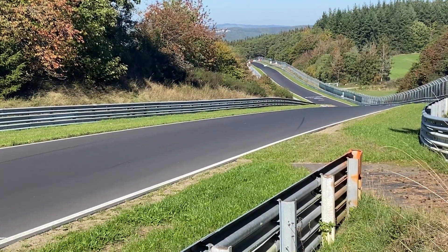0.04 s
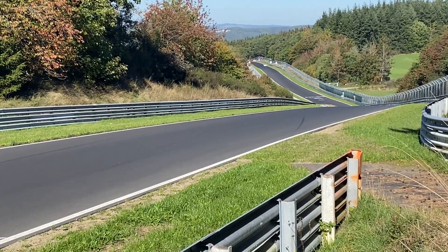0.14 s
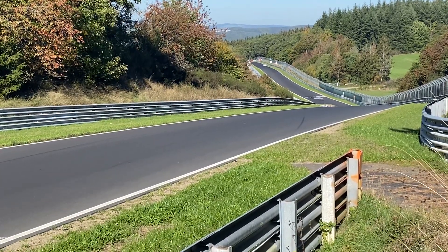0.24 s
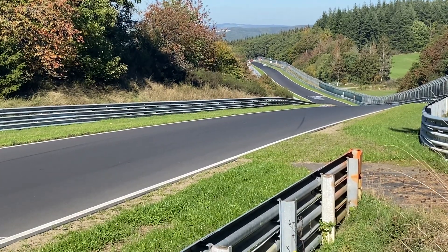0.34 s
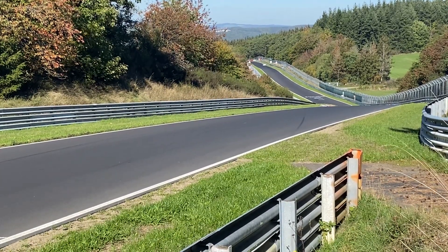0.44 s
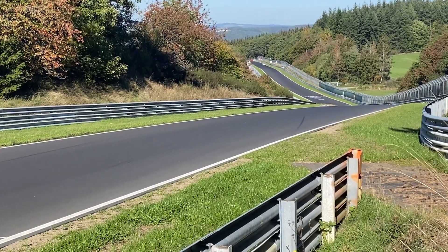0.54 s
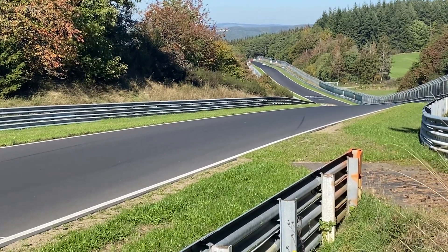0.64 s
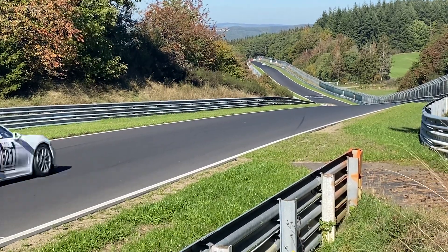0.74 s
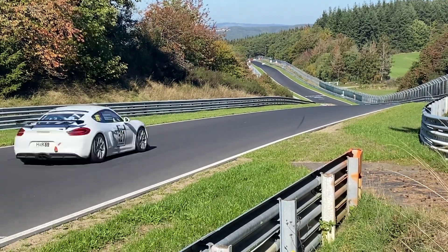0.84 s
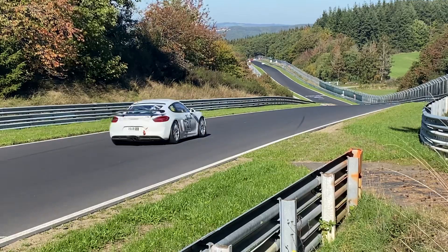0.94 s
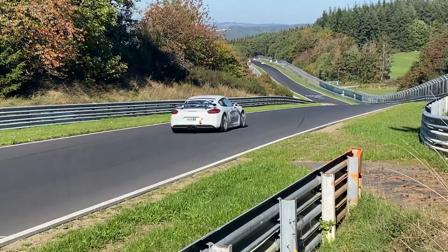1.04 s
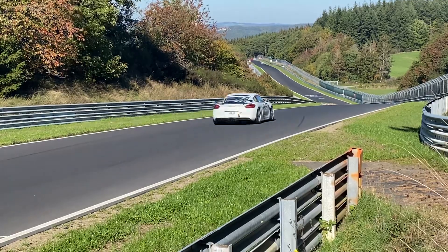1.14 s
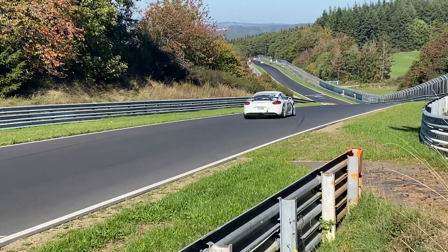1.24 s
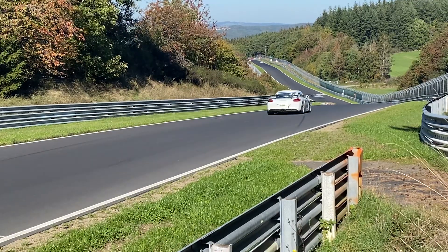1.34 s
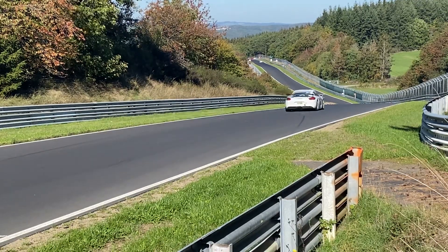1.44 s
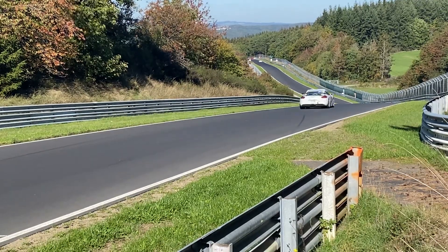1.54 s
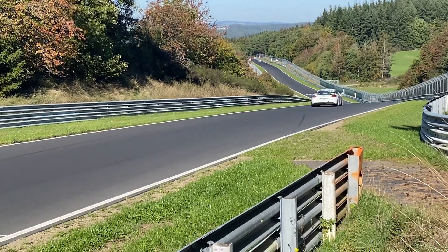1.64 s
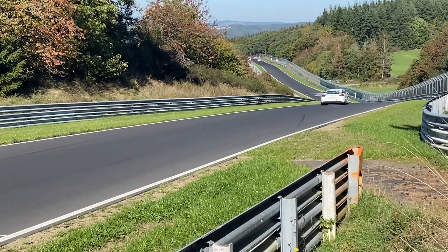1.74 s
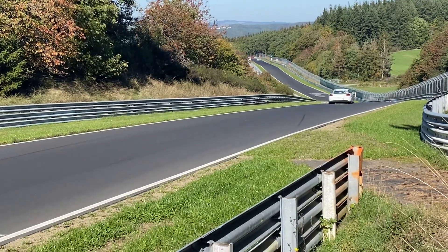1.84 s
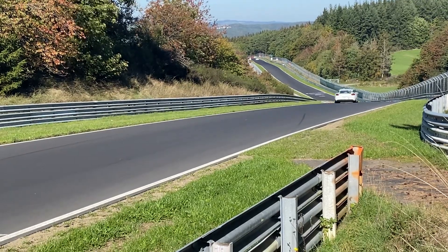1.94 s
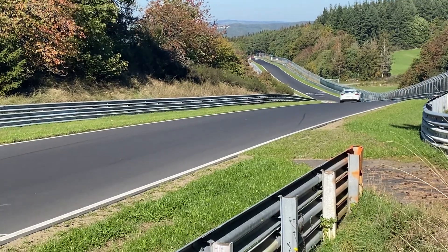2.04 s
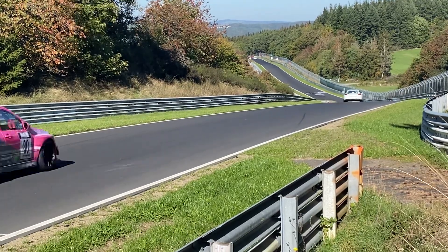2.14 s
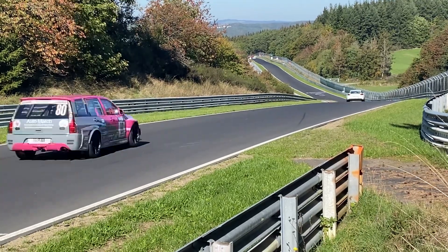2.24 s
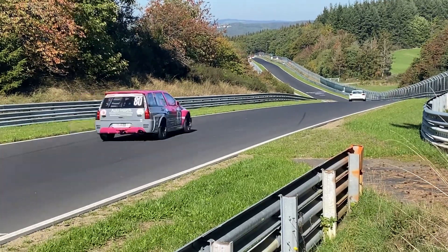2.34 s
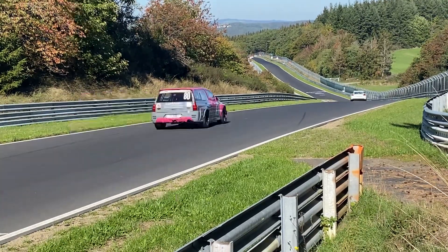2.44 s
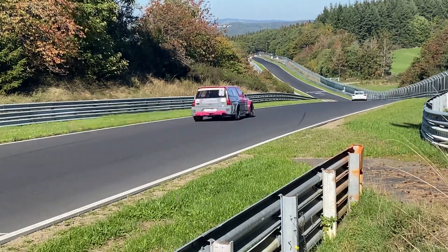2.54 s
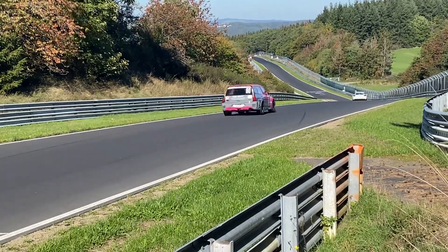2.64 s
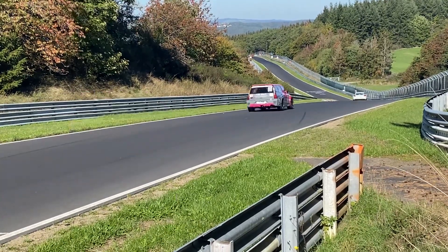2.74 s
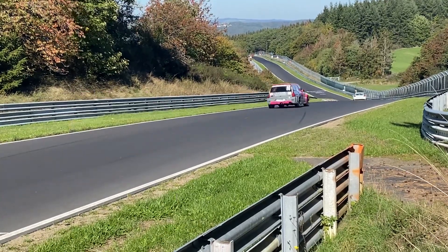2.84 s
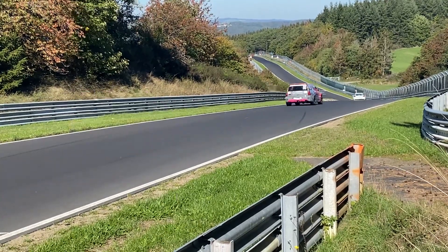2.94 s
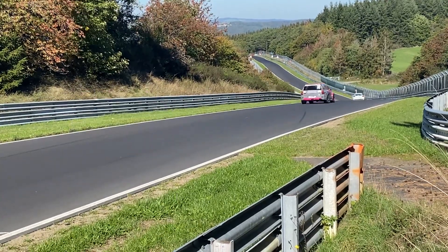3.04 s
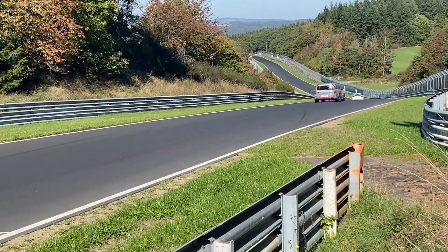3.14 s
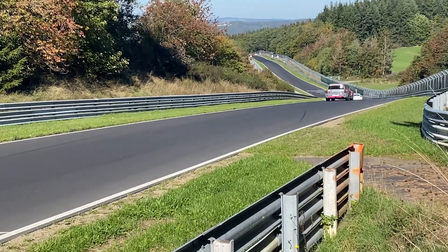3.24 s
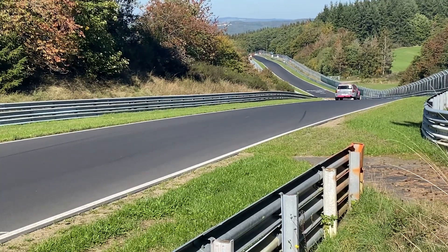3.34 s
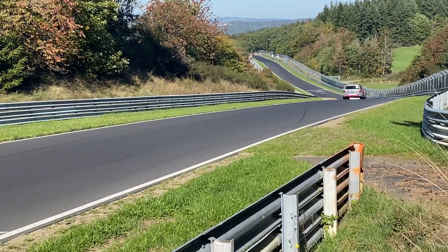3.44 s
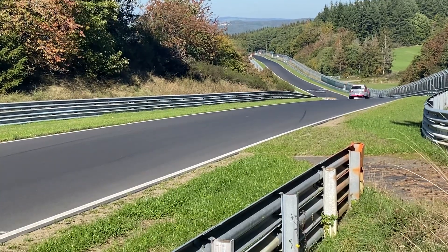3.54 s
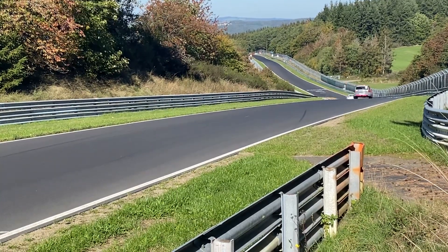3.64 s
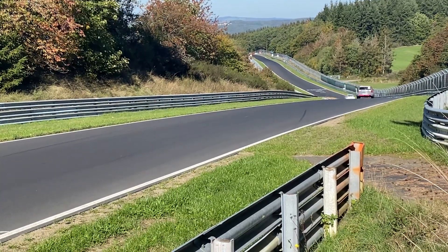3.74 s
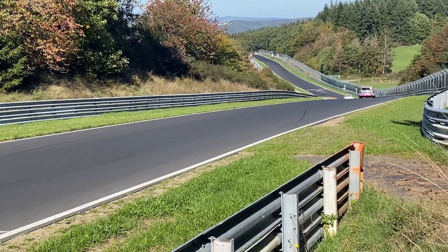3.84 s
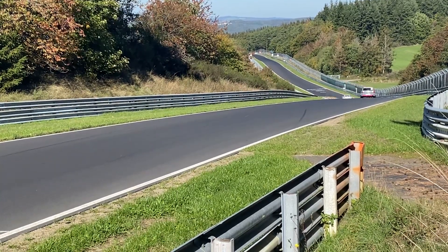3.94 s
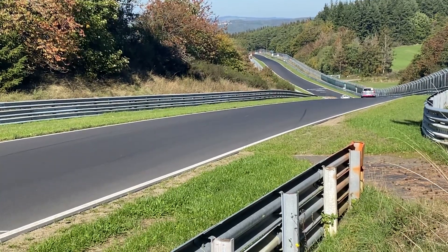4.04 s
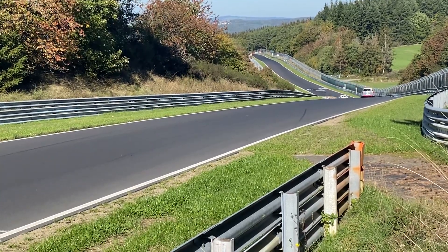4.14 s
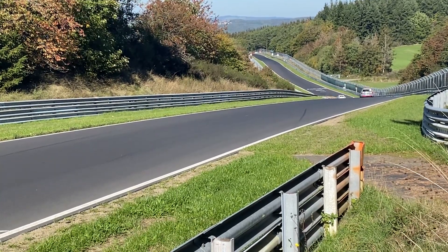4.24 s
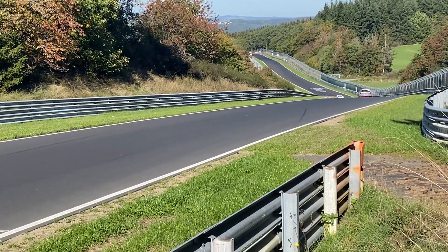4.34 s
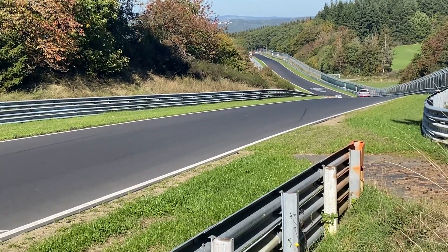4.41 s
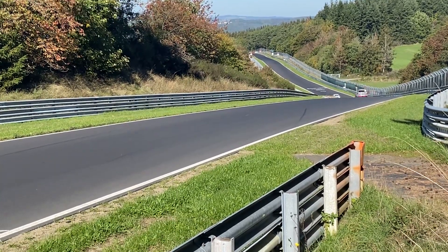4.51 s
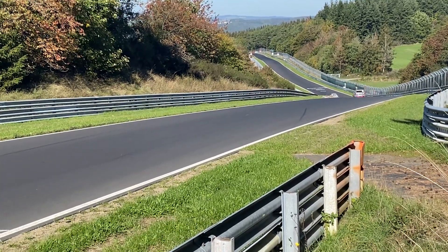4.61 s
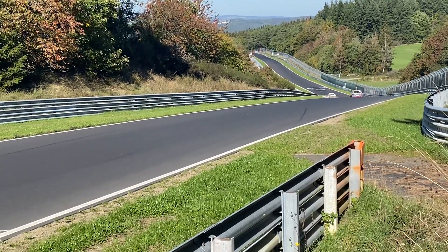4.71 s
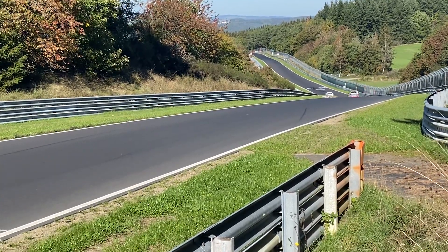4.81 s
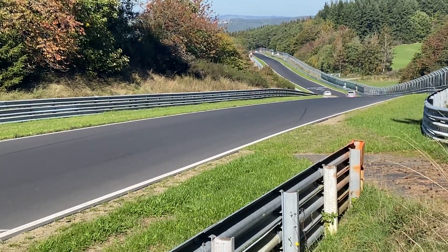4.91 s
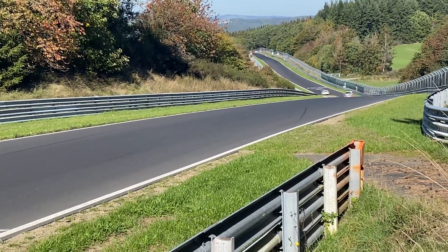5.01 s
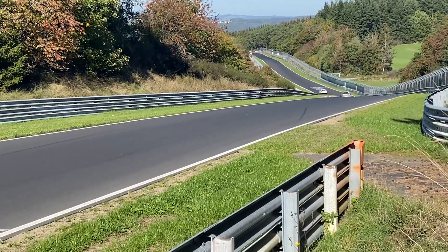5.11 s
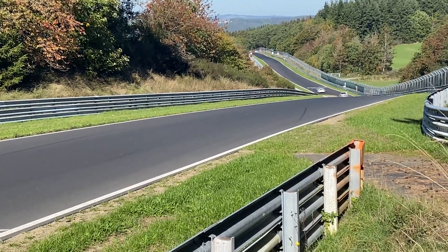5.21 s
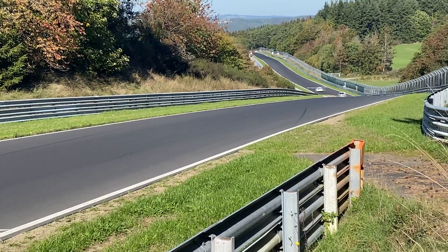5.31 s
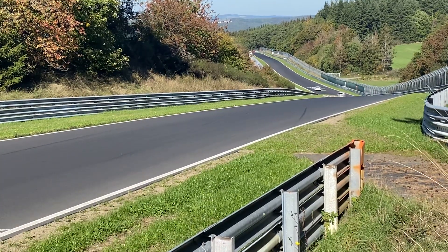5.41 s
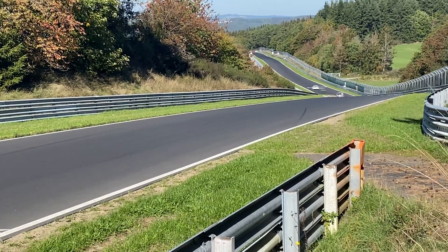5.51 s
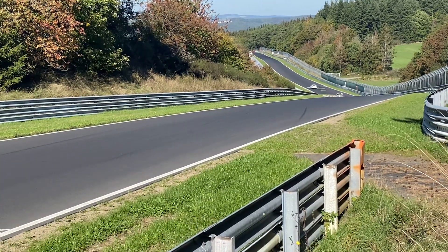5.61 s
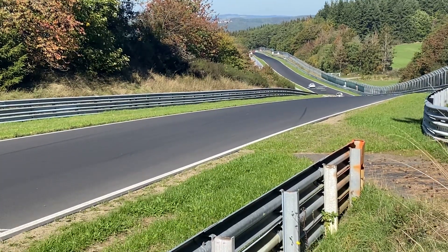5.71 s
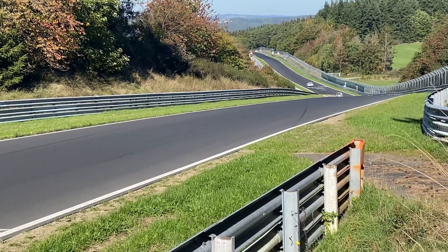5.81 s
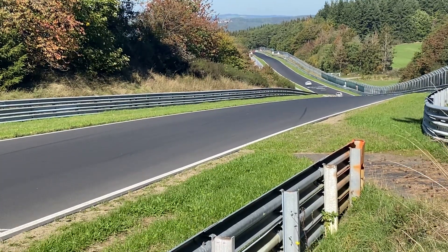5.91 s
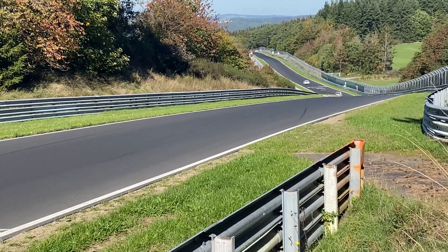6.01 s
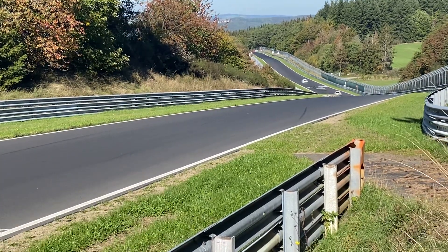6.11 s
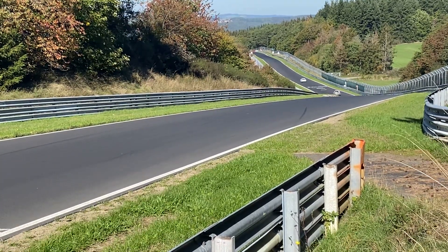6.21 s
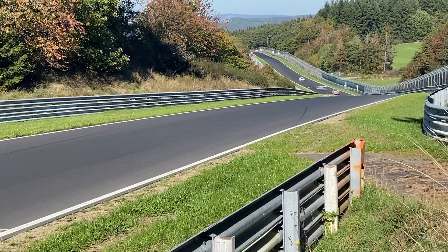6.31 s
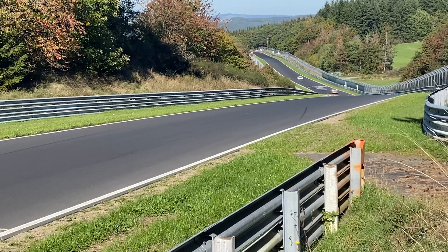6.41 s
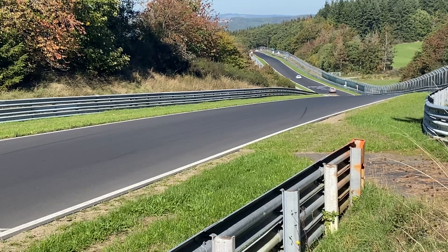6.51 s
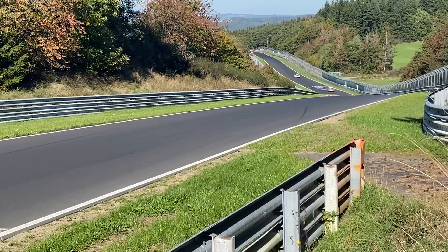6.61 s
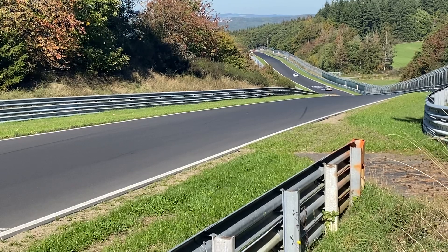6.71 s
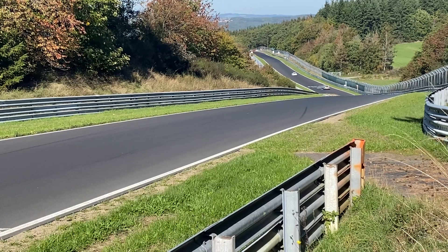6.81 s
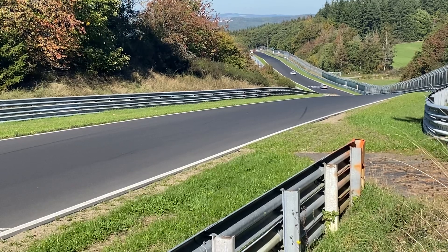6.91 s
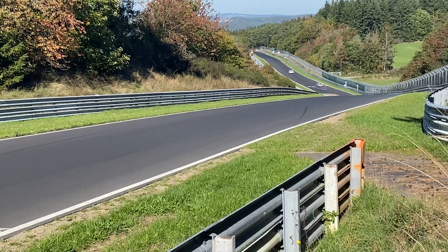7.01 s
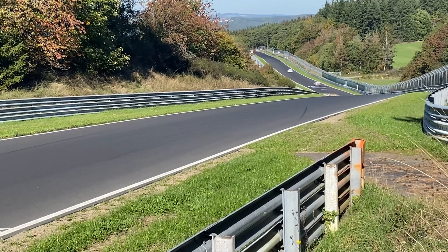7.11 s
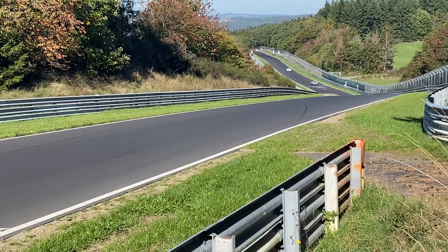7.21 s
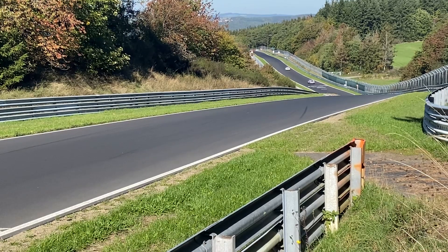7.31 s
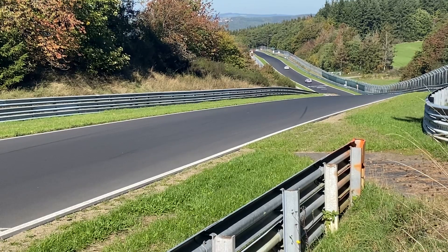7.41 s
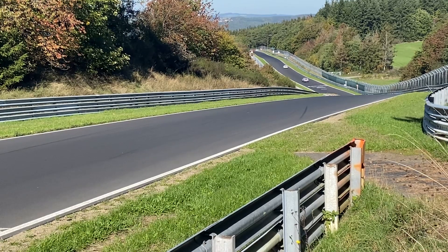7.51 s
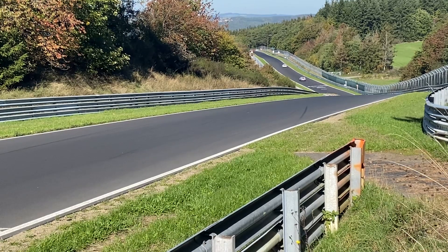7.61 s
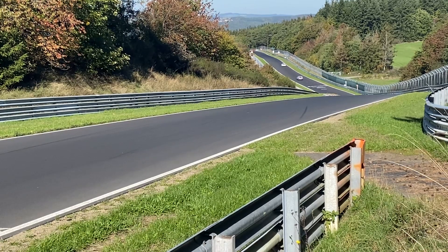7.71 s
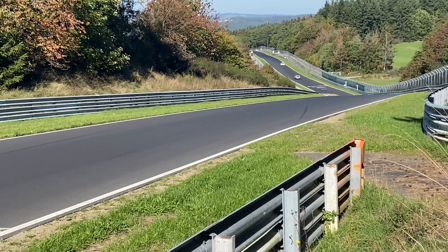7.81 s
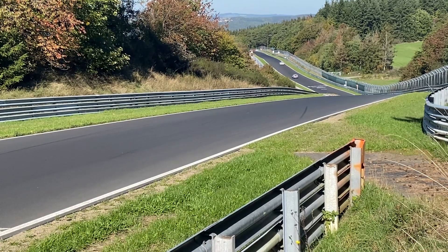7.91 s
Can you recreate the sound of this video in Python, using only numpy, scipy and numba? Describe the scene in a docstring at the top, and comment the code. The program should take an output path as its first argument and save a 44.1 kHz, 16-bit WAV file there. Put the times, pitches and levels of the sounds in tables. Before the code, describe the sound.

Outdoors beside a hilly race track, close to the barrier. A six-cylinder coupe rushes past at once with sliding tyre roar and a falling engine note. Over a second later a rougher four-cylinder estate passes, then lifts off with burbles and pops. Its drone continues down the hill, with another crackling lift before it pulls again, distant.

```python
"""At a barrier beside a hill road, two race cars pass from the left and run off down the hill.
A six-cylinder coupe leads and rebounds off the far barrier; its crank orders are summed cosines.
A four-cylinder estate follows, lifts off twice, burbles and pops: firing orders and ringing pulses.
Tyre and gas roar is banded noise, dulled by distance; faint whines and rasps surface from far off."""
import sys
import numpy as np
from scipy import signal
from scipy.fft import rfft, irfft, next_fast_len
from scipy.io import wavfile
from numba import njit

SR = 44100
rng = np.random.default_rng(int(sys.argv[2]) if len(sys.argv) > 2 else 0)


def transcribe(u):
    """Save the signal u as a 16-bit wav file named by the first command-line argument.

    u: samples, shape (n,) or (channels, n), limited to [-1, 1]; the rate is SR.
    q: integer samples, one column per channel.
    """
    v = np.clip(np.atleast_2d(u).T, -1, 1)
    q = np.round(v * 32767).astype(np.int16)
    wavfile.write(sys.argv[1], SR, q)


N = 351036  # samples


def undb(db):
    """Decibel law: 20 dB is a factor of ten in amplitude."""
    return 10 ** (np.asarray(db) / 20)


def curves(table):
    """Linear interpolation: the columns of a timed table at every sample."""
    s, *columns = np.transpose(table)
    return [np.interp(np.arange(N) / SR, s, c) for c in columns]


def gate(table, fade_s=0.011):
    """Linear fading: 1 within the time span of a table, 0 outside."""
    t = np.arange(N) / SR
    return np.clip(np.minimum(t - table[0][0], table[-1][0] - t) / fade_s + 1, 0, 1)


def across(hz, table):
    """Logarithmic pitch: a spectrum table read along a log frequency axis."""
    f, v = np.transpose(table)
    return np.interp(np.log(np.maximum(hz, 1)), np.log(f), v)


def between(x, marks, columns):
    """Logarithmic interpolation: a blend of the level curves at the nearest marks."""
    weights = [np.interp(np.log(x), np.log(marks), row) for row in np.eye(len(marks))]
    return sum(w * c for w, c in zip(weights, columns) if w)


def unit(x):
    """Normalisation: scale to a root mean square of 1."""
    return x / np.sqrt(np.mean(x ** 2))


@njit
def svf(x, hz, width):
    """Resonance: a state-variable band-pass with gain 1 at the centre."""
    y, b, l = np.empty(len(x)), 0., 0.
    g, k = np.tan(np.pi * hz / SR), width / hz
    for i in range(len(x)):
        v = (b + g * (x[i] - l)) / (1 + g * (g + k))
        b, l, y[i] = 2 * v - b, l + 2 * g * v, k * v
    return y


def resonate(x, hz, width):
    """Cascaded resonance: two equal band-passes in a row, narrower together than one."""
    return svf(svf(x, 1. * hz, 1. * width), 1. * hz, 1. * width)


def walk(rate):
    """Random drift: normal draws at a rate per second joined by lines, spread about 1.5."""
    knots = rng.standard_normal(int(N / SR * rate) + 2)
    return 1.82 * np.interp(np.arange(N) / SR * rate, np.arange(len(knots)), knots)


def partial(turns, db, rough):
    """Harmonic order: a cosine in step; uneven burning and moving air shake its size and phase."""
    size = undb(db + 3.6 * rough * walk(16))
    return -np.sqrt(2) * size * np.cos(2 * np.pi * turns + rough * walk(30))


def murmur(hz, db, drift_hz):
    """Narrow-band noise: two random drifts modulate a moving carrier in quadrature."""
    angle = 2 * np.pi * np.cumsum(hz) / SR
    return undb(db) * unit(walk(drift_hz) * np.cos(angle) + walk(drift_hz) * np.sin(angle))


# Each car on a straight line: speed in m/s, time heard abreast in seconds, nearest distance in m.
COUPE_PATH, ESTATE_PATH = (47.1, .551, 8.3), (46.8, 1.942, 7.05)
SOUND_M_S = 343


def passing(speed, s, nearest):
    """Retarded time: metres past and metres away as the sound left the car, with its Doppler factor."""
    t = np.linspace(-2, 10, 2400)
    along = speed * (t - s)
    # the delay is counted from the nearest point
    heard = t + (np.hypot(along, nearest) - nearest) / SOUND_M_S
    along = np.interp(np.arange(N) / SR, heard, along)
    r = np.hypot(along, nearest)
    return along, r, 1 / (1 + speed * along / r / SOUND_M_S)


# Faint far whines. Each row: time in seconds, frequency in Hz, level in dB.
FAR_WHINES = [
    [(4.77, 2030, -55), (4.9, 2045, -52), (4.95, 2050, -56), (5, 2060, -51), (5.05, 2060, -60),
     (5.17, 2100, -55), (5.22, 2100, -62)],
    [(5.9, 1290, -58), (6.1, 1290, -53), (6.3, 1280, -56)],
]
# Faint hum from down the hill. Each row: time in seconds, frequency in Hz, level in dB.
HUM = [(5.4, 397.6, -50.5), (5.8, 392.4, -44), (6.5, 397, -42.5), (7.1, 396, -43), (7.35, 397, -41.5),
       (7.6, 398.4, -46), (7.8, 398, -37), (7.96, 400.2, -45)]
HUM_OCTAVE_DB = -12  # against the hum
# Short rough far rasps. Each row: time in seconds, centre in Hz, level in dB.
RASPS = [
    [(5.12, 1797, -58), (5.19, 1765, -44.5), (5.25, 1610, -54)],
    [(6.48, 1750, -59), (6.6, 1880, -47), (6.67, 1850, -59)],
]


def far_whines():
    """Tone and noise: unsteady cosines for whines and hum, narrow-band noise for rasps."""
    far = 0
    for whine, rough in [(row, .7) for row in FAR_WHINES] + [(HUM, .23)]:
        hz, db = curves(whine)
        far = far + gate(whine) * partial(np.cumsum(hz) / SR, db, rough)
    hz, db = curves(HUM)
    far += gate(HUM) * partial(2 * np.cumsum(hz) / SR, db + HUM_OCTAVE_DB, .3)
    return far + sum(gate(rasp) * murmur(*curves(rasp), 600) for rasp in RASPS)


# Turbo whistle of the estate. Each row: time in seconds, centre in Hz, level in dB.
WHISTLE = [(1.75, 12300, -78), (1.9, 11750, -68), (2.0, 11350, -66), (2.15, 11500, -67), (2.4, 11700, -70),
           (2.6, 11750, -82)]


def turbo_whistle():
    """Narrow-band noise: a thin high whistle around a gliding centre."""
    return gate(WHISTLE) * murmur(*curves(WHISTLE), 250)


# Rumble, body, roar and hiss. Each row: coupe abreast in dB, estate abreast in dB,
# loss in dB per tenfold distance, gain from behind in dB, share of the swells.
ROAR = [(-36.5, -37, 10, 0.2, 0.47), (-27.5, -33, 13.5, -2.5, 0.92), (-30.5, -35.5, 10.5, 1.5, 1),
        (-33.5, -35.5, 28.5, 3, 0.52)]
# The roar swells and sinks down the hill. Each row: time in seconds, change in dB before that share.
SWELLS = [(0, 4), (.25, 4.5), (.55, -5), (.83, 4.5), (1.05, -1), (1.9, -0.6), (2.5, 3), (2.95, -2.5),
          (3.2, 1.5), (3.8, -3.5), (4.5, -4.5), (5.2, 2), (5.9, -1.5), (6.3, -2), (6.6, -1.5), (6.9, -2.5),
          (7.2, -2.5), (7.6, -1.5), (7.96, -3)]


def roar_levels():
    """Distance loss and directivity: four base levels of roar in dB for each car."""
    swell = curves(SWELLS)[0]
    cars = []
    for car, path in enumerate((COUPE_PATH, ESTATE_PATH)):
        along, r, _ = passing(*path)
        bands = []
        for row in ROAR:
            loss = row[2] * np.log10(r / path[2])
            bands.append(row[car] - loss + row[3] * along / r + row[4] * swell)
        cars.append(bands)
    return np.array(cars)


# Estate off the throttle. Each row: start in seconds, end in seconds, burble in dB,
# stutter of the firing in dB per unit drift, firing note change in dB (only drops act), deep burble in dB.
OVERRUN = [(2.76, 3.13, -38, 10.5, -2, -33.5), (3.13, 3.55, -49, 2, 1, -34),
           (5.412, 5.815, -34.5, 4.5, -3, -40.5), (5.845, 6.394, -36.5, 1.5, -1, -39)]


def lifted():
    """Engine load: change of the estate's firing note in dB, lower while off the throttle."""
    return np.min([row[4] * gate([row[:1], row[1:2]]) for row in OVERRUN], axis=0)


# Centres of the four roar levels in Hz.
ROAR_HZ = [70, 400, 1500, 5500]
# Colour of the roar. Each row: frequency in Hz, change in dB.
ROAR_COLOUR = [(30, -8.5), (45, -11), (70, 6), (1500, 1.5), (2600, 6), (3600, 2), (5500, 1.5), (8000, -16),
               (11000, -6.5), (15000, -17.5)]
# The treble comes and goes on its own. Each row: time in seconds, change in dB.
TREBLE = [(0, -2), (.2, 0.5), (.4, -2), (.52, -0.5), (.61, 1), (.67, -3), (.74, 3), (.79, -1), (.83, 2),
          (.87, -1.5), (.92, 6), (.96, 2), (1.3, 4), (1.55, 6), (1.85, 0), (2.05, -2), (2.2, 0.5),
          (2.42, 4.5), (2.7, 1.5), (2.9, 1), (3.3, 1.5), (3.7, -1.5), (4.5, 1.5), (5.3, -3), (5.7, 2.5),
          (6.5, -4), (7.96, -1.5)]
# The hiss tears in patches just behind the coupe. Each row: m past the listener, dB per unit drift.
TEARING = [(-1, 0), (3, .6), (17, .6), (21, 0)]
LIFT_RUMBLE_DB = 5  # in the first off-throttle stretch


def roar():
    """Turbulence noise: tyres and gas as third-octave bands of noise that flicker."""
    levels = 10 * np.log10(undb(2 * roar_levels()).sum(axis=0))  # powers of the two cars add
    levels[0] += LIFT_RUMBLE_DB * gate([OVERRUN[0][:1], OVERRUN[0][1:2]])
    levels[3] += curves(TREBLE)[0]
    out, gusts, tears = 0, walk(7.1), walk(45)
    tear_db = np.interp(passing(*COUPE_PATH)[0], *np.transpose(TEARING))
    for hz in 32 * 2 ** np.arange(0, 9, 1 / 3):
        band = unit(resonate(rng.standard_normal(N), hz, hz / 3))
        bright = min(hz / 5000, 1)
        db = between(hz, ROAR_HZ, levels) + across(hz, ROAR_COLOUR) - 6.5
        db += 0.17 * bright * gusts + (1.04 + 0.33 * bright) * walk(12)
        db += (2500 < hz < 9000) * tear_db * (tears + walk(37.0))
        # air swallows the top faster still as the cars get far
        db += .5 * max(np.log2(hz / 6000), 0) * (levels[3] + 26.5)
        out = out + undb(db) * band
    return out


PIPE_SMEAR = .027  # turns of lag per squared order: higher orders leave the pipe later

# Coupe engine speed. Each row: time in seconds, crank turns in Hz before Doppler shift.
COUPE_REVS = [(.12, 71.24), (.22, 74.25), (3.6, 80.01), (6.3, 79.85), (7, 78.7)]
# Coupe over crests and dips. Each row: time in seconds, base level in dB.
COUPE_LEVEL = [(0, -20.5), (.1, -21), (.22, -17.5), (.3, -12), (.5, -13.5), (.8, -16.5), (1, -23.5),
               (1.4, -24.5), (1.9, -32), (2.45, -30), (3, -31), (3.6, -34.5), (3.9, -42.5), (5.3, -37.5),
               (5.8, -39), (6.3, -36), (6.6, -45), (7.96, -36.5)]
# Places of the coupe's voice in metres past the listener.
COUPE_PLACES_M = (-15, -4, 5, 24, 42, 110, 180, 235)
# Coupe voice. Each row: crank order, then dB against the base level at each place.
COUPE_VOICE = [(3, -1.5, -1, -4, 2, 3, -2.5, -4, -2.5), (4, -7.5, -5, -13, -13, -9.5, -6, -11.5, -6.5),
               (5, -1, -8.5, -5, -11, -12, -6, -10.5, -8.5), (6, -2.5, -5, 0.5, -11.5, -7, 1.6, -12.5, -5),
               (8, -20, -19, -14.5, -15, -21, -15.5, -6.5, -17.5),
               (9, -16, -14, -7.5, -10, -15.5, 0, -7, -7),
               (10, -30, -12.5, -13, -10.5, -19, -8, -13, -26.5),
               (12, -37, -31, -28, -32, -25, -12, -10.5, -17),
               (13.5, -31, -21, -13, -18, -19, -27, -28.5, -30),
               (18, -28, -23, -23, -17.5, -28, -36, -32.5, -37.5)]
# Other coupe orders. Each row: multiple of the crank rate, dB against the nearest voiced orders.
COUPE_ORDERS = [(1, -17), (1.5, -18.5), (2, -16.5), (7, -8.5), (11, -3), (15, -0.5), (16, 1)]


def coupe():
    """Engine orders: six cylinders in two banks sound multiples of the crank rate, Doppler-shifted."""
    along, _, doppler = passing(*COUPE_PATH)
    turns = np.cumsum(curves(COUPE_REVS)[0] * doppler) / SR
    marks = [row[0] for row in COUPE_VOICE]
    level_db = curves(COUPE_LEVEL)[0]
    levels = [level_db + np.interp(along, COUPE_PLACES_M, row[1:]) for row in COUPE_VOICE]
    # orders 4 and 5, between the firings, flutter most while the car is near
    uneven = np.interp(along, (20, 60), (.42, .1))
    # still half hidden by the bend, it arrives broken up
    broken = 1 + 4 * np.exp(-np.arange(N) / SR / .16)
    out = 0
    for k, db in zip(marks, levels):
        rough = broken * (.07 + .013 * k) + (k in (4, 5)) * uneven
        out = out + partial(k * turns - PIPE_SMEAR * k ** 2, db, rough)
    for k, db in COUPE_ORDERS:
        order_db = between(k, marks, levels) + db
        out += partial(k * turns - PIPE_SMEAR * k ** 2, order_db, 0.036 + 0.033 * k)
    return out * undb(-2.2 * (broken - 1) * abs(walk(22)))


# Roar bands that slide down as the coupe draws level. Each row: time in seconds, centre in Hz, level in dB.
COUPE_SWISH = [
    [(0, 3050, -42), (.12, 2886, -34.5), (.25, 2530, -24.5), (.38, 2330, -35.5), (.5, 2080, -32.5)],
    [(.15, 1730, -30.5), (.27, 1578, -29.5), (.4, 1490, -31.5), (.45, 1280, -18.5), (.5, 1053, -29),
     (.7, 943, -25.5), (.85, 912, -31.5)],
    [(.49, 3290, -44), (.55, 3185, -30), (.6, 3050, -43)],
]
# Drift rate of each sliding band in Hz, which sets its width.
SWISH_DRIFT_HZ = [750, 450, 500]


def coupe_swish():
    """Gliding narrow-band noise: three bands slide down in pitch."""
    return sum(gate(band) * murmur(*curves(band), drift_hz)
               for band, drift_hz in zip(COUPE_SWISH, SWISH_DRIFT_HZ))


# Coupe off the far barrier. Each row: time in seconds, crank turns in Hz, level of order 6 in dB.
REBOUND = [(.8, 73, -55), (.92, 72, -30.5), (1.1, 70.5, -29), (1.27, 70, -38), (1.36, 70, -33),
           (1.55, 70.6, -32.5), (1.65, 70, -39)]


def coupe_rebound():
    """Reflection: crank orders 6 and 5 return from the far barrier at their own pitch."""
    back_hz, back_db = curves(REBOUND)
    back = np.cumsum(back_hz) / SR
    return gate(REBOUND) * (partial(6 * back, back_db, 0.46) + partial(5 * back, back_db - 5, 0.18))


# Estate engine speed. Each row: time in seconds, firing rate in Hz before Doppler shift.
ESTATE_REVS = [(3.9, 168.2), (5.2, 172.5), (6.6, 174.6), (7.25, 175.3), (7.8, 176.1)]
# Estate under throttle. Each row: time in seconds, firing note in dB, overtone base level in dB.
ESTATE_LEVEL = [(1.3, -38, -92), (1.6, -25, -44), (1.8, -19, -35.5), (2, -14, -25.5), (2.3, -14, -32),
                (2.5, -18.5, -37), (2.7, -20, -45.5), (3.55, -30, -54), (3.75, -26, -48.5),
                (4.1, -23, -45.5), (4.4, -24, -41), (5, -18.5, -35), (5.2, -19.5, -37), (5.38, -20.5, -38),
                (6, -23, -49.5), (6.45, -23.5, -46.5), (6.9, -20, -36.5), (7.5, -21, -35), (7.96, -23, -42)]
# Places of the estate's voice in metres past the listener.
ESTATE_PLACES_M = (-12, 3, 14, 60, 220)
# Estate voice. Each row: firing multiple, then dB against the overtone base level at each place.
ESTATE_VOICE = [(2, 16, 7.5, 6, 2.5, 4), (3, 5, 2, 0.5, -2, -13), (4, -1, -12, 2, -4, -2.3),
                (5, -14, 3, 2, -6.5, -19), (6, -4, 0, -1, -10.5, -17.5), (7, -22, -8, -11, -28.5, -35)]
# Half orders at each place: dB against the overtone base level.
HALF_ORDERS_DB = (-3.5, -3, -1, -4, -4)
# Quarter orders at each place: dB against the half orders.
QUARTERS_DB = (-4, -2, 0, -4, -3.5)
# Relative steepness at each place of the half orders' upward fall.
HALF_ROLL = (0.8, 0.14, .4, 0.83, 0.99)
# Relative roughness of the half and quarter orders at each place.
UNEVEN = (1.2, .7, 1, .9, .8)
# A pipe resonance that points backward: lift in dB at each place.
PIPE_PEAK_DB = (2, 3.5, 6, 8.2, 9.1)
# High orders come clear twice on the far slope. Each row: time in seconds, change in dB.
UPPER = [(2.6, -2.5), (4.6, -7), (5, 5.5), (5.2, 6.5), (5.35, 0), (5.6, -3), (7.25, -5), (7.55, 6.5),
         (7.96, 12)]
OVERTONE_DROP = 1.2  # times the drop of the firing note
PIPE_PEAK_HZ, PIPE_PEAK_WIDTH_HZ = 640, 34
PIPE_DIP_HZ, PIPE_DIP_DB = 695, -6  # the null just above the resonance
# Gear whine. Each row: time in seconds, base level in dB.
GEARS = [(1.6, -54), (1.72, -39), (1.8, -38), (1.86, -43), (1.93, -39), (2.0, -56)]
# Gear orders. Each row: multiple of the firing rate, dB against the base level.
GEAR_ORDERS = [(7.57, -0.79), (12.8, -1.5)]


def estate():
    """Firing harmonics: four cylinders sound multiples; unequal ones add half and quarter orders."""
    along, _, doppler = passing(*ESTATE_PATH)
    hz = curves(ESTATE_REVS)[0] * doppler
    fires = np.cumsum(hz) / SR
    note_db, over_db = curves(ESTATE_LEVEL) + lifted() * np.array([[1], [OVERTONE_DROP]])
    marks = [1] + [row[0] for row in ESTATE_VOICE]
    levels = [note_db] + [over_db + np.interp(along, ESTATE_PLACES_M, row[1:]) for row in ESTATE_VOICE]
    half_db = over_db + np.interp(along, ESTATE_PLACES_M, HALF_ORDERS_DB)
    by_place = (HALF_ROLL, UNEVEN, QUARTERS_DB, PIPE_PEAK_DB)
    roll, uneven, quarter_db, peak_db = (np.interp(along, ESTATE_PLACES_M, row) for row in by_place)
    upper_db = curves(UPPER)[0]
    out = 0
    for k in np.arange(2, 30) / 4:
        between_firings = k % 1 != 0
        if between_firings:
            # the pipe carries these best near three and a half firings
            db = half_db - 5.4 * abs(np.log2(k / 3.75)) - 22.7 * roll * max(np.log2(k / 3.55), 0)
            db = db + (k > 4.6) * .6 * upper_db + (k % 1 != .5) * quarter_db
        else:
            db = between(k, marks, levels) + (k > 4) * upper_db
        # orders around the pipe resonance stay in step and throb once in four firings
        lag = rng.random() if between_firings and not 3.6 < k < 4.6 else PIPE_SMEAR * k ** 2
        db = db + peak_db * np.exp(-((k * hz - PIPE_PEAK_HZ) / PIPE_PEAK_WIDTH_HZ) ** 2)
        db = db + PIPE_DIP_DB * np.exp(-((k * hz - PIPE_DIP_HZ) / 20) ** 2)
        rough = .05 + (.05 * uneven if between_firings else .03) * k
        out = out + partial(k * fires - lag, db, rough)
    gear_on, gear_db = gate(GEARS), curves(GEARS)[0]
    for k, db in GEAR_ORDERS:
        out += gear_on * partial(k * fires, gear_db + db, .8)
    return fires, out * gate(ESTATE_LEVEL, .2)


# Pipe resonances. Each row: centre in Hz, nominal width in Hz, level in dB.
# The first is the deep burble, the others together the burble; each of the two is then normalised.
PIPE = [(86, 31, 0), (150, 130, 1), (291, 160, -26)]
BARK_HZ, BARK_STAGE_WIDTH_HZ = 617, 152
BARK_DB = -19.5  # against the burble
# The estate's level dips briefly. Each row: centre in seconds, half length in seconds, depth in dB.
DIPS = [(5.779, .012, -10.5), (5.822, 0.0089, -10), (5.887, 0.024, -6), (6.023, 0.012, -8),
        (6.272, 0.0067, -10)]
# Unburnt fuel pops in the pipe. Each row: time in seconds, peak in dB, thump in Hz,
# bark in dB before the peak is normalised.
POPS = [(2.8, -13, 81, -31), (2.828, -14.5, 144, -34.5), (2.903, -15.5, 74.5, -30), (2.916, -16, 77.4, -29),
        (2.94, -10, 108, -25.5), (2.952, -12, 115, -26), (3.099, -14, 99.5, -28), (3.13, -13.5, 76.5, -27),
        (3.152, -27.5, 148, -34), (3.271, -19, 145.4, -27), (3.388, -20.5, 145, -27),
        (3.479, -20, 152, -32), (5.419, -15.5, 118, -32), (5.448, -17, 162, -31), (5.498, -15, 147, -25),
        (5.518, -19.5, 154.5, -27), (5.556, -17, 140, -28.5), (5.594, -16, 91, -26.5),
        (5.687, -16, 147, -26.5), (5.718, -19.5, 166, -24), (5.786, -19.5, 163, -25.5),
        (5.807, -18.5, 148, -28.5), (5.835, -22, 151, -30.5), (6.17, -19.5, 159, -27.5)]
POP_T60_S, BARK_T60_S, POP_RISE_S = .045, .08, .0015


def overrun(fires, four):
    """Pulse excitation: off the throttle uneven firings ring the pipe, the note stutters and fuel pops."""
    at = np.flatnonzero(np.diff(np.floor(fires)))
    pulses = np.zeros(N)
    chance = rng.random((len(at), 2))
    sign = np.where(chance[:, 1] < .35, -1, 1)
    pulses[at] = undb(-3.0 * np.log(0.035 + chance[:, 0])) * sign
    # each stage is wider than nominal because two in a row narrow the band
    deep, *rest = [undb(db) * resonate(pulses, hz, 1.5 * width) for hz, width, db in PIPE]
    deep, thump = unit(deep), unit(sum(rest))
    bark = unit(resonate(pulses, BARK_HZ, BARK_STAGE_WIDTH_HZ))
    out = four.copy()
    for start, end, db, stutter_db, _, deep_db in OVERRUN:
        lift = gate([(start,), (end,)])
        out = out * undb(-lift * stutter_db * abs(walk(35)))
        out += lift * undb(db) * (thump + undb(BARK_DB) * bark)
        out += lift * undb(deep_db) * deep
    for s, length, db in DIPS:
        out *= undb(db * np.exp(-((np.arange(N) / SR - s) / length) ** 2))
    t = np.arange(4096) / SR
    for s, db, hz, bark_db in POPS:
        ring = np.sin(2 * np.pi * hz * t) * undb(-60 * t / POP_T60_S)
        ring += undb(bark_db - db - 60 * t / BARK_T60_S) * np.sin(2 * np.pi * BARK_HZ * t)
        ring *= 1 - np.exp(-t / POP_RISE_S)
        out[int(s * SR):int(s * SR) + len(t)] += undb(db) * ring / ring.max()
    return out


AHEAD = .1  # leftward sine of the bearing of the road ahead


def bearing():
    """Power weighting: leftward sine of the cars' bearing, led by the one with the louder hiss."""
    weights = undb(2 * roar_levels()[:, 3])
    left = []
    for path in (COUPE_PATH, ESTATE_PATH):
        along, r, _ = passing(*path)
        left.append(AHEAD + (1 - AHEAD) * (1 - along / r) / 2 + path[2] / r / 4)
    return np.sum(weights * np.minimum(left, 1), axis=0) / weights.sum(axis=0)


# Side signal for a source fully left. Each row: frequency in Hz, side against mid in dB.
PORT_SIDE = [(50, -20), (200, -9.5), (550, -4.5), (900, -1), (1800, -1), (2700, -12), (4000, -30)]
# Extra lead of side beyond a quarter turn. Each row: frequency in Hz, lead in radians.
PORT_TURN = [(800, 0), (1250, .35), (2700, 1.1)]
# Fixed balance. Each row: frequency in Hz, share moved to the left.
PORT_TILT = [(60, -.075), (170, -.11), (300, .05), (550, .2), (850, .06), (1300, .08), (2500, 0)]
# Diffuse side before the bearing's gain. Each row: frequency in Hz, level against mid in dB.
SPREAD = [(60, -34), (300, -26), (900, -15), (1300, -9), (2000, -12), (3000, -21), (4500, -36), (7000, -20),
          (10000, -7), (15000, -4)]


def ports(mid):
    """Interaural delay: at two close ports, sound from the left makes side lead mid by a quarter turn up."""
    size = next_fast_len(N + 16384)
    hz = np.arange(size // 2 + 1) * SR / size
    spectrum = rfft(mid, size)
    left = bearing()
    lead = 1j * np.exp(1j * across(hz, PORT_TURN)) * undb(across(hz, PORT_SIDE))
    side = left * irfft(spectrum * lead, size)[:N]
    side += irfft(spectrum * across(hz, PORT_TILT), size)[:N]
    # a randomly smeared copy widens the sound, most in the top treble
    n = np.arange(8192)
    smear = rng.standard_normal(len(n)) * np.exp(-n / SR / .04)
    smear = rfft(smear / np.linalg.norm(smear), size) * undb(across(hz, SPREAD))
    side += (1 + 1.5 * left) * irfft(spectrum * smear, size)[:N]
    return np.array([mid + side, mid - side])


def scene():
    """Superposition: all sources add in air before they reach the two ports."""
    background = far_whines() + turbo_whistle() + roar()
    leader = coupe() + coupe_swish() + coupe_rebound()
    return ports(background + leader + overrun(*estate()))


HISS_DB = -88
TOP_HZ = 15700


def record(dry):
    """Band-limiting and saturation: faint hiss, deepest bass lost, peaks rounded, then the top cut."""
    hiss = undb(HISS_DB) * rng.standard_normal(dry.shape)
    heard = signal.sosfilt(signal.butter(4, 38, "high", fs=SR, output="sos"), dry + hiss)
    rounded = 1.3 * np.tanh(heard / 1.3)
    return signal.sosfilt(signal.ellip(10, .2, 80, TOP_HZ, fs=SR, output="sos"), rounded)


dry = scene()
out = record(dry)
transcribe(out)
```